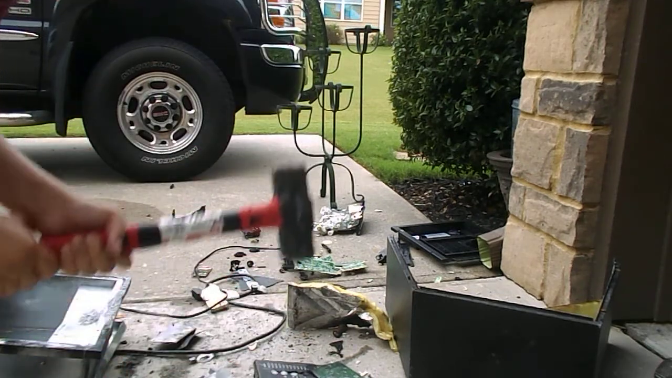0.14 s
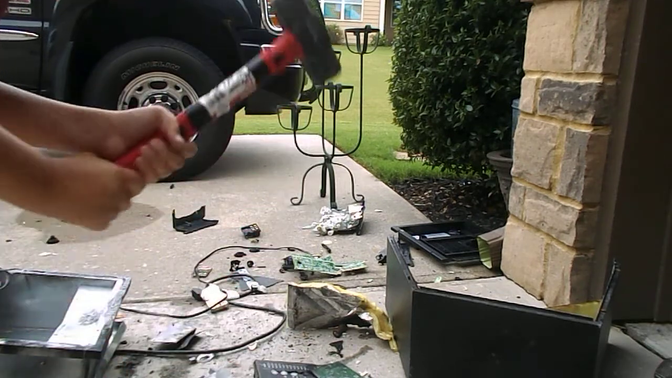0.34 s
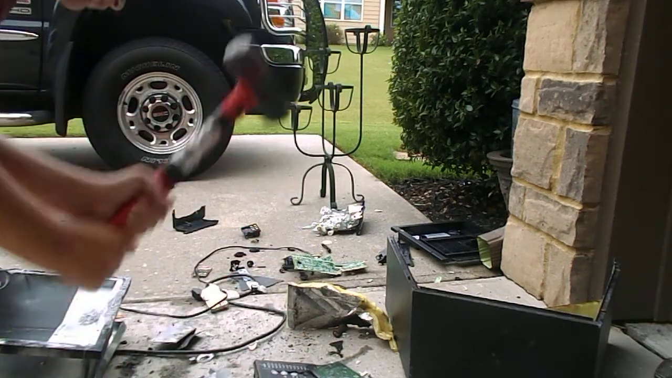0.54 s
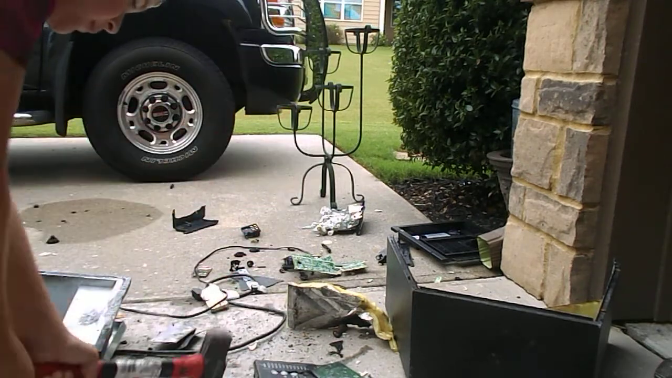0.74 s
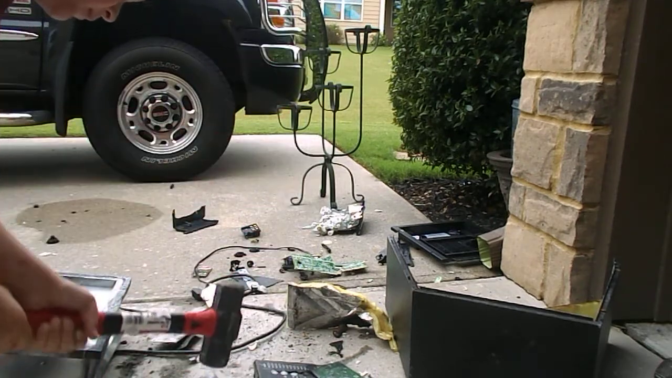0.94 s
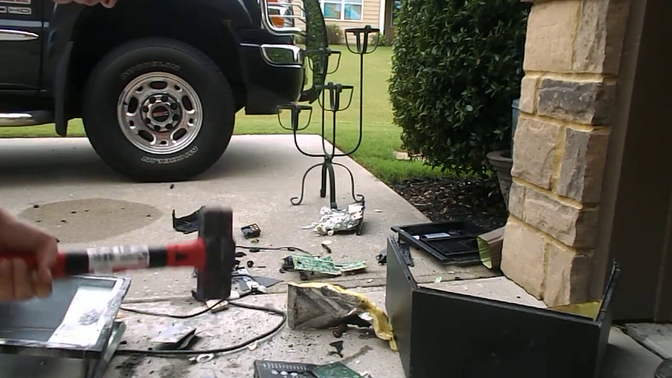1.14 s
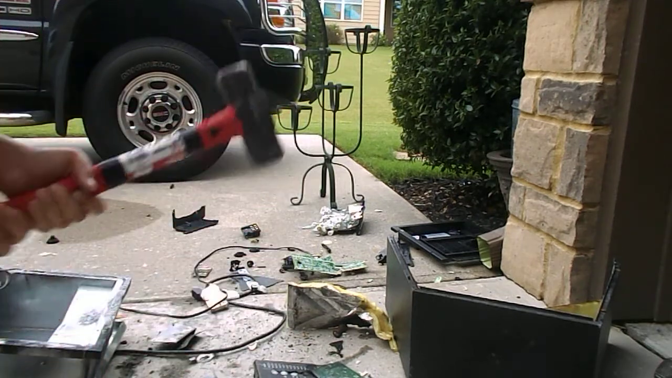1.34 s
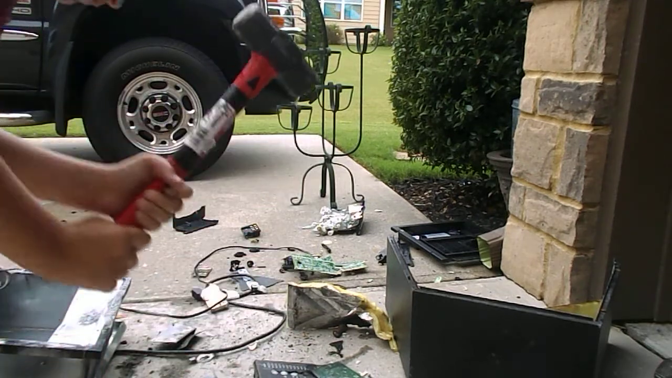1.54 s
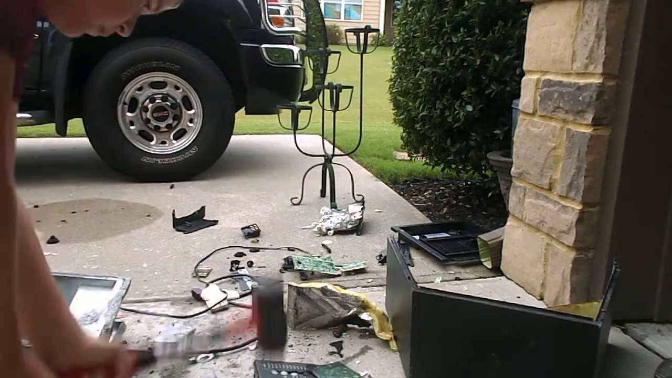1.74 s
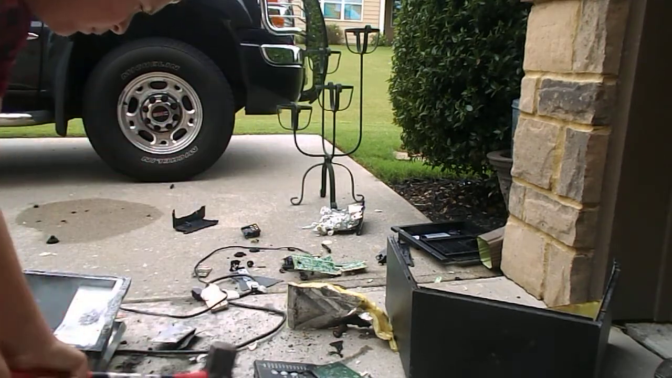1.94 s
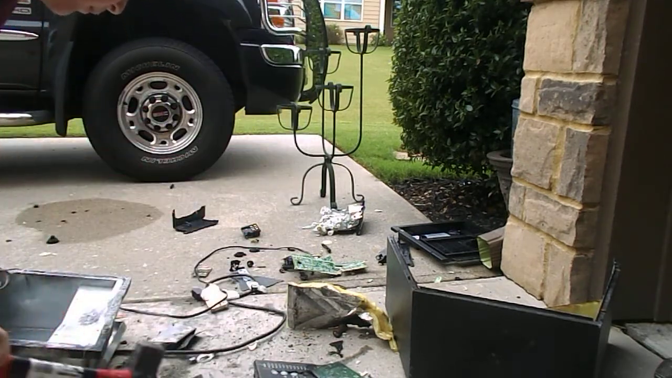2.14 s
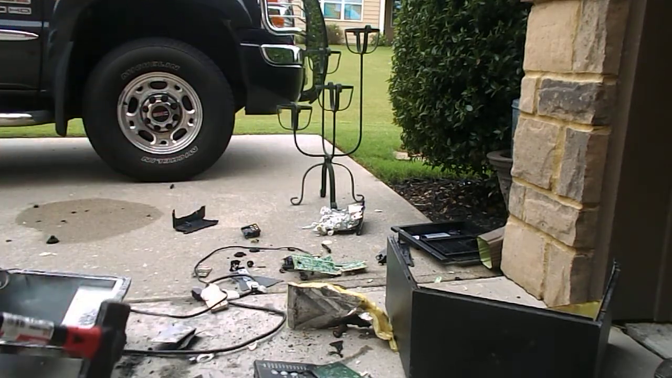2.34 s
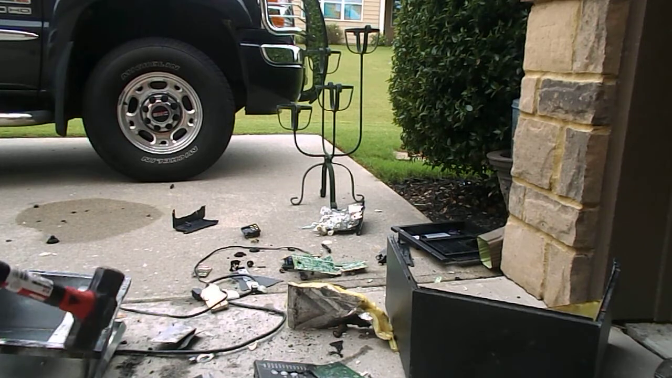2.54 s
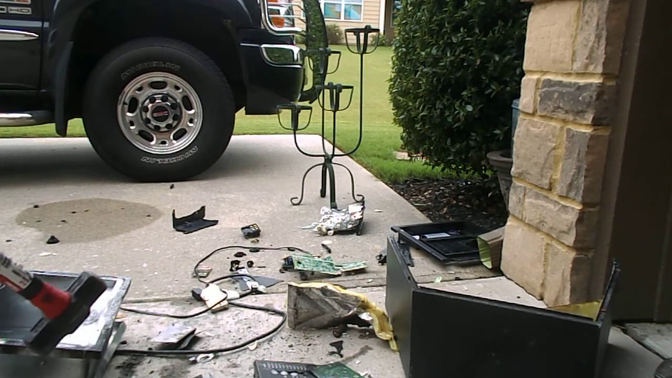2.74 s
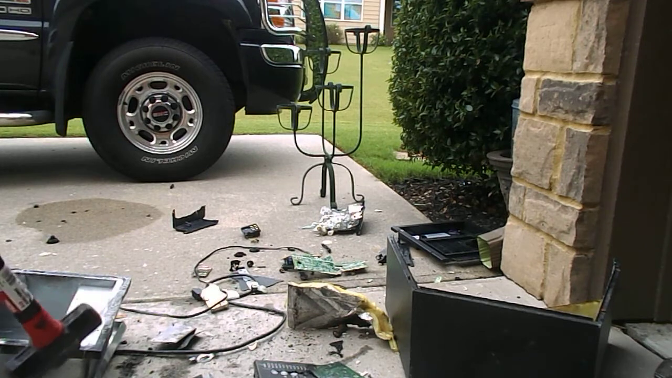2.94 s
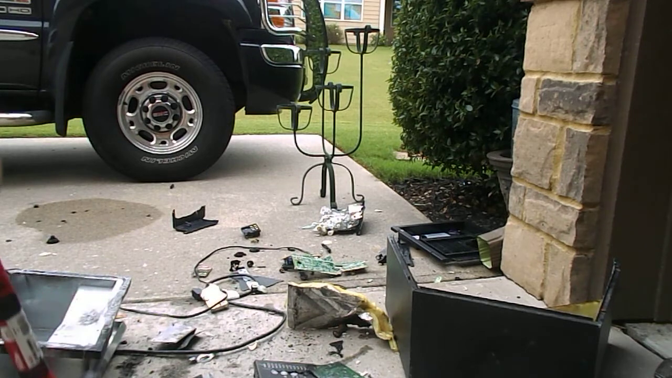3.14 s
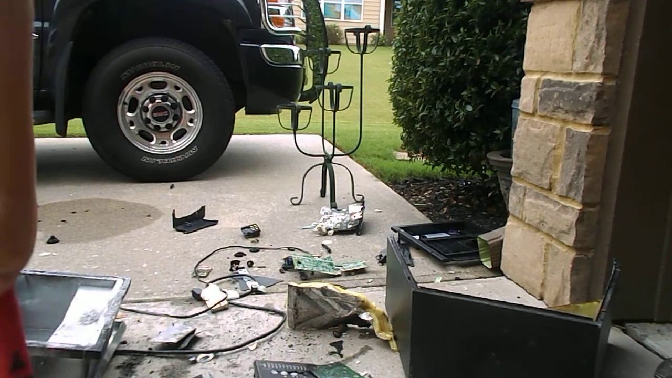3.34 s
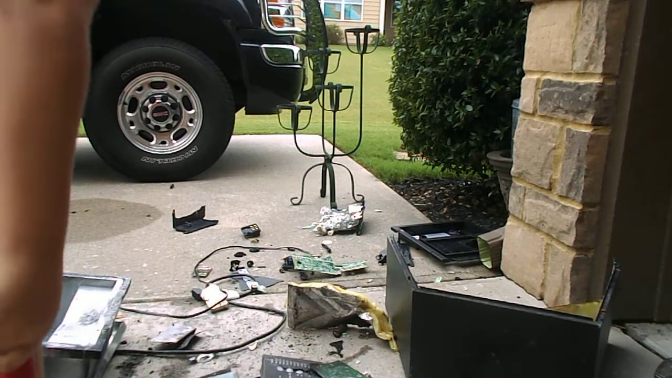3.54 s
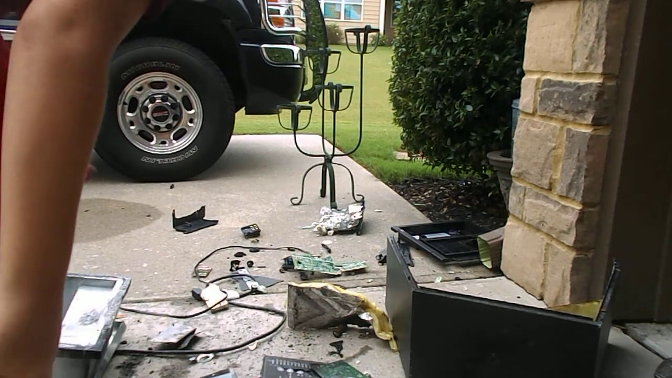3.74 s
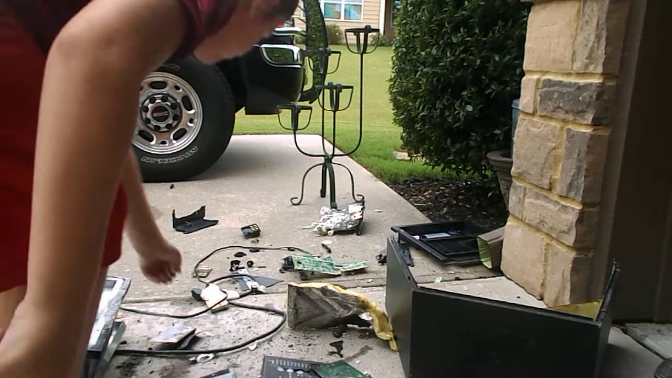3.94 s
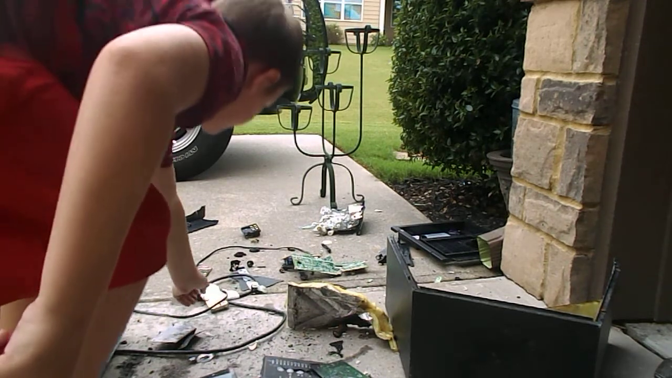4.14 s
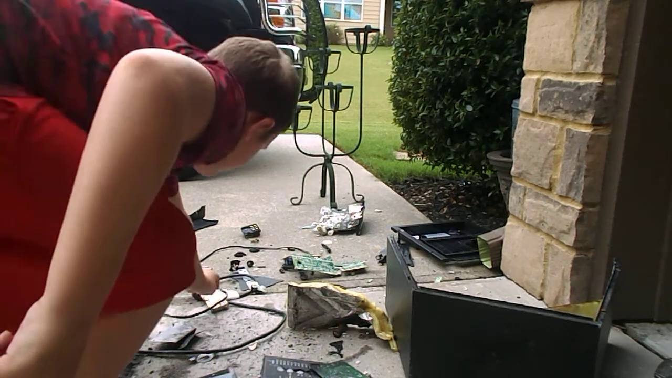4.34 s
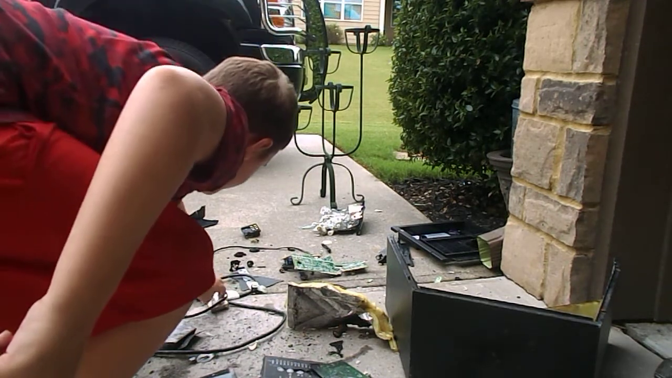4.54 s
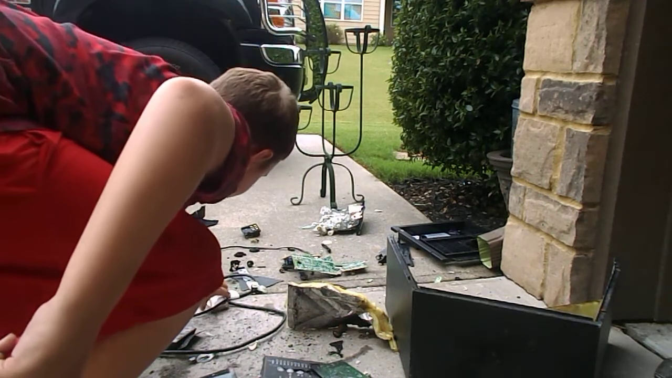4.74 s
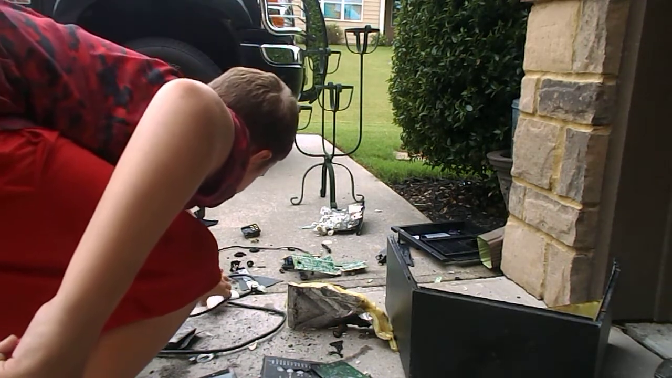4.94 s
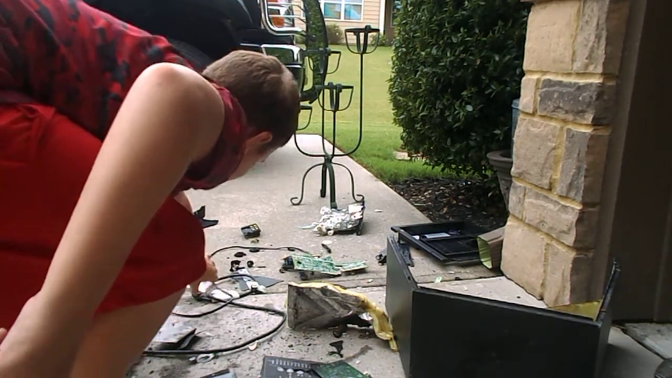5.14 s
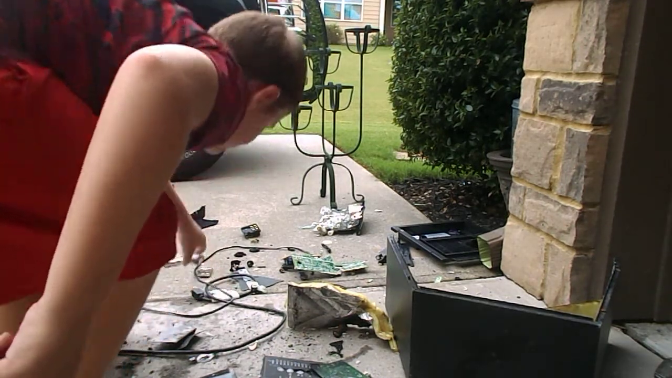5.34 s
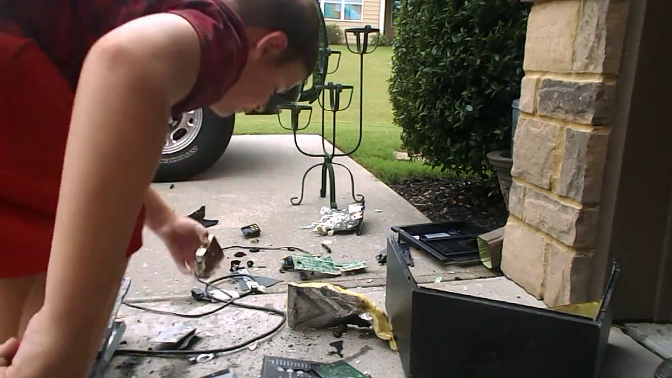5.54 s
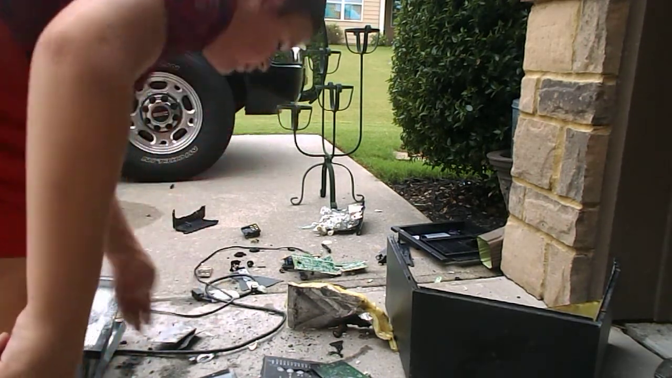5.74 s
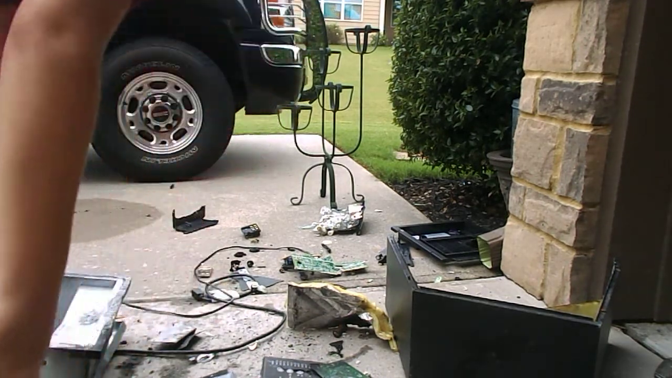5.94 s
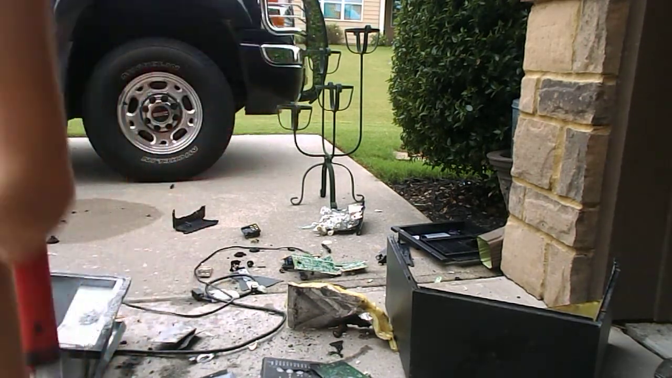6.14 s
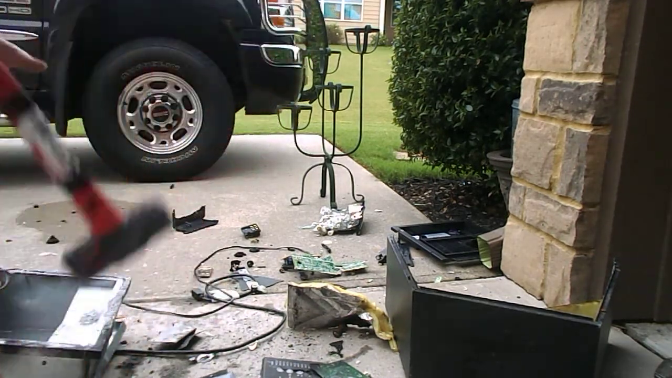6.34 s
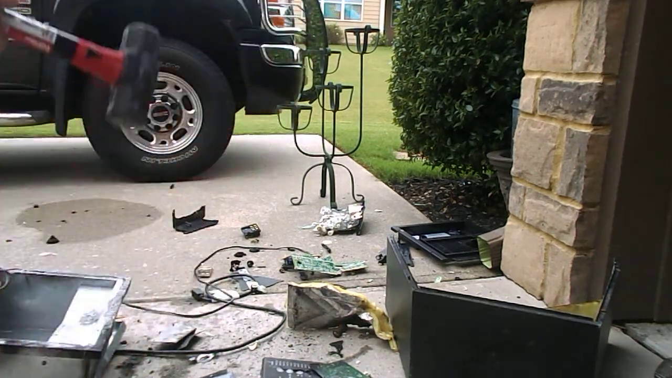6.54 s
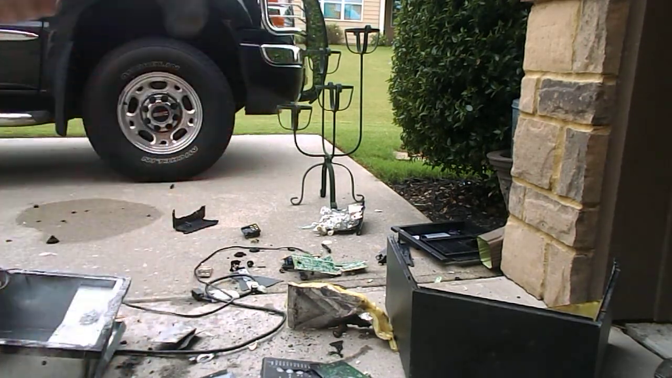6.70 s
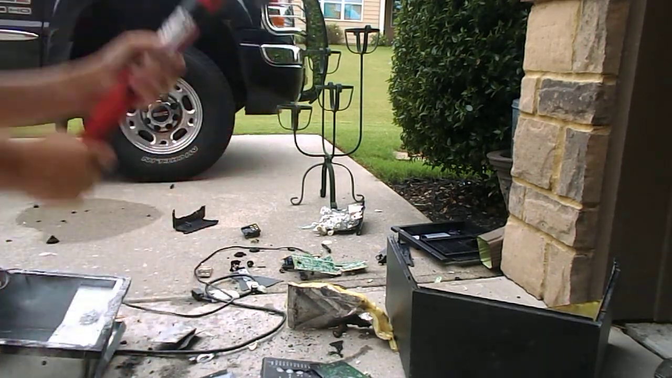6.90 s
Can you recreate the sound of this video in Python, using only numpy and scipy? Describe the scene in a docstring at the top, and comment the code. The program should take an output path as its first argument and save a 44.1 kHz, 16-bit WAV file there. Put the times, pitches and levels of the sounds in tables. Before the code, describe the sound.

Close, sharp crashes of a sledgehammer on sheet metal open the scene, each one ringing briefly as the housing clatters back onto concrete. After a pause come a softer strike, a dull box thud and light scraping and clicking of broken parts. Another rattling blow lands late, followed by scattered ticks. Soft outdoor air and a low machine hum lie behind, with a faint high insect buzz in the second half.

```python
"""A sledgehammer smashes thin metal housings on a concrete drive. Each impact cracks and excites the
bending modes of the sheet metal, which rings and rattles while an automatic gain control holds it flat.
Loose parts bounce, tick and scrape, and a hollow box thuds once.
Behind it a machine hums in the outdoor air, and an insect starts to buzz."""
import sys
import numpy as np
from scipy import signal
from scipy.fft import rfft, irfft
from scipy.io import wavfile
from scipy.ndimage import uniform_filter1d

SR = 44100
rng = np.random.default_rng(int(sys.argv[2]) if len(sys.argv) > 2 else 0)


def materialize(psi):
    """Save the field psi as 16-bit PCM at rate SR to the path in sys.argv[1].

    A 1-D psi becomes a single channel; in a 2-D psi each row is a channel.
    """
    bounded = np.clip(np.atleast_2d(psi).T, -1, 1)
    quanta = np.round(bounded * 32767).astype(np.int16)
    wavfile.write(sys.argv[1], SR, quanta)


N = 307377
TIME = np.arange(N) / SR
AGE = TIME[:SR]   # one second of ringing

# The housing's dense, weak modes. Each row: frequency in Hz, relative spectral density in dB.
SHEET_SPECTRUM = [(60, -42), (150, -27), (300, -22), (520, -17.5), (750, 2.5), (1200, 4), (2300, 2.5),
                  (3000, 2), (4300, 0), (5500, -5.5), (6500, -15), (8000, -20.5), (9500, -18.5),
                  (11000, -17)]


def from_db(db):
    """Decibels as an amplitude ratio."""
    return 10 ** (np.asarray(db) / 20)


def rms_one(x):
    """Normalisation to unit rms."""
    return x / np.sqrt(np.mean(x ** 2) + 1e-20)


def at_hz(points, hz):
    """Interpolation on a logarithmic frequency axis."""
    freqs, values = np.transpose(points)
    return np.interp(np.log(np.maximum(hz, 1)), np.log(freqs), values)


def tilted(hz, tilt, low_hz=600, high_hz=5000, pivot_hz=2000):
    """Spectral tilt: the gain of a midrange slope in dB per octave."""
    return from_db(tilt * np.log2(np.clip(hz, low_hz, high_hz) / pivot_hz))


def wander(per_s, size):
    """Random modulation: straight lines between Gaussian values."""
    knots = rng.standard_normal(int(per_s * size / SR) + 2)
    return np.interp(np.arange(size) * per_s / SR, np.arange(len(knots)), knots)


def noise(spectrum, size, tilt=0, humps_db=0, hump_spacing_hz=170):
    """Random-phase noise of unit rms; chance resonances set one piece of metal apart from another."""
    hz = np.fft.rfftfreq(size, 1 / SR)
    phases = np.exp(2j * np.pi * rng.random(len(hz)))
    centres = np.arange(0, SR / 2, hump_spacing_hz)
    humps = humps_db * np.interp(hz, centres, rng.standard_normal(len(centres)))
    return rms_one(irfft(phases * from_db(at_hz(spectrum, hz) + humps) * tilted(hz, tilt), size))


def decay(t60):
    """Exponential damping: 60 dB down after t60 seconds."""
    return from_db(-60 * AGE / t60)


def mode(hz, t60):
    """A normal mode: a damped sinusoid of random phase."""
    return np.sin(2 * np.pi * (hz * AGE + rng.random())) * decay(t60)


def add(track, s, sound):
    """Superposition: a sound joins the track at s seconds."""
    start = round(s * SR)
    part = sound[max(-start, 0):N - start]
    track[max(start, 0):max(start, 0) + len(part)] += part


def air(start_db=-55, rise_db_per_s=0.54):
    """Broadband ambient noise outdoors, slowly growing louder."""
    # Each row: frequency in Hz, relative spectral density in dB.
    spectrum = [(25, -15), (60, -5), (110, -2.5), (200, 2), (300, -7.5), (500, -8), (1000, -11.5),
                (2000, -13), (4000, -13.5), (5500, -20.5), (7000, -33), (11000, -33.5)]
    return from_db(start_db + rise_db_per_s * TIME) * noise(spectrum, N)


def machine_hum(pitch_hz=98.5, waver=0.00685, wavers_per_s=4, fundamental_db=3.0):
    """Periodic vibration gives a harmonic series: a wavering fundamental with weak overtones."""
    # The overtones. Each row: harmonic number, level in dB.
    harmonics = [(2, -60.5), (3, -66.5), (4, -67)]
    # The fundamental's envelope. Each row: time in seconds, relative level in dB.
    levels = [(0.0, -67.5), (2.14, -66.5), (2.41, -53), (2.83, -81), (3.22, -59.5), (3.71, -81),
              (3.9, -55.5), (4.8, -52), (5.75, -54), (5.86, -51), (6.33, -52.5), (6.97, -57.5)]
    phase = 2 * np.pi * np.cumsum(pitch_hz * (1 + waver * wander(wavers_per_s, N))) / SR
    envelope = from_db(fundamental_db + np.interp(TIME, *np.transpose(levels)))
    overtones = sum(from_db(db) * np.sin(round(k) * phase) for k, db in harmonics)
    return np.sqrt(2) * (envelope * np.sin(phase) + overtones)


def insect(start_s=4.57, swell_s=.55, level_db=-52, throb_hz=23, depth=.28):
    """Amplitude modulation of a high, narrow noise band: a buzz that swells and holds."""
    # Each row: frequency in Hz, relative spectral density in dB.
    spectrum = [(3500, -28), (4950, -5), (5330, 7), (5750, -2), (6600, -11.5), (8000, -39), (10500, -27)]
    swell = np.clip((TIME - start_s) / swell_s, 0, 1)
    throb = 1 + depth * np.sin(2 * np.pi * throb_hz * TIME)
    return from_db(level_db) * swell * throb * noise(spectrum, N)


def wall_reflections(x, wet_db=-9, t60=0.55, gap_s=.005):
    """Reverberation: diffuse reflections from nearby walls follow the direct sound."""
    tail = rng.standard_normal(SR) * decay(t60) * (AGE > gap_s)
    return x + from_db(wet_db) * signal.fftconvolve(x, tail / np.linalg.norm(tail))[:N]


def box_thud(start_s=3.728, noise_db=-17, t60=0.082, modes_db=-12, rise_s=0.0013):
    """A soft, heavy impact excites the low modes of a hollow box."""
    # Each row: frequency in Hz, relative level in dB, t60 in seconds.
    modes = [(136, -16, 0.069), (222, -9, 0.09), (285, 3.5, 0.035), (345, -26, 0.068), (437, -2.5, 0.043),
             (600, 3.5, 0.023)]
    # The dull contact. Each row: frequency in Hz, relative spectral density in dB.
    spectrum = [(40, -39), (110, -19), (200, -7), (280, -1), (400, 3), (580, -4), (900, -4), (3000, -42)]
    out = np.zeros(N)
    boom = sum((-1) ** k * from_db(db) * np.sin(2 * np.pi * hz * AGE) * decay(mode_t60)
               for k, (hz, db, mode_t60) in enumerate(modes))
    contact = from_db(noise_db) * noise(spectrum, SR) * decay(t60)
    onset = 1 - np.exp(-AGE / rise_s)
    add(out, start_s, (from_db(modes_db) * boom + contact) * onset)
    return out


def clanks():
    """Strongly damped modes: a dropped hollow piece rings briefly at each of two touches."""
    # Each row: start in seconds, level in dB.
    touches = [(4.129, -33), (4.146, -28.5)]
    # Each row: frequency in Hz, relative level in dB, t60 in seconds.
    modes = [(880, -7, 0.042), (1052, 0.5, 0.053), (1173, -6, 0.068), (4350, -2, 0.079)]
    out = np.zeros(N)
    for s, db in touches:
        add(out, s, from_db(db) * sum(from_db(level) * mode(hz, t60) for hz, level, t60 in modes))
    return out


def shards(tick_db=-5, tick_t60=0.017, scrape_db=-15, grain_db=6.0, grains_per_s=500):
    """Friction and impact: light pieces scrape unevenly as they tip, and tick at mid-stroke."""
    # Each row: tick time in seconds, relative level in dB, scrape half-width in seconds,
    # tilt in dB per octave.
    pieces = [(3.288, -29.5, 0.026, -3.5), (3.358, -23.5, 0.018, 1.5), (4.042, -28, .001, 2),
              (4.0962, -31, .001, 7), (4.13, -20.5, 0.0057, -1), (4.1466, -12, .002, 0),
              (4.47, -33.5, 0.016, 2.5), (4.6765, -20.5, 0.0012, 3.5), (4.7906, -32, .005, -4.5),
              (4.931, -29.5, 0.0053, 0), (5.3957, -37, .001, -3), (5.694, -29, 0.0034, -3),
              (5.833, -30.5, 0.028, -11.5), (6.3315, -9, 0.00088, 10), (6.4421, -20.5, 0.0031, 6.5),
              (6.539, -16, 0.01, -5), (6.5737, -15, 0.0011, 7), (6.588, -9.5, 0.0084, -1),
              (6.867, -24, 0.0077, -1), (6.9483, -26.5, 0.0011, 6.5)]
    # Each row: frequency in Hz, relative spectral density in dB.
    spectrum = [(100, -45), (650, -22), (1000, -5), (1400, -6.5), (2200, 6.5), (3300, 2), (4500, 6),
                (6500, -10.5), (8000, -18.5), (11000, -14.5)]
    out = np.zeros(N)
    for s, db, half_width, tilt in pieces:
        add(out, s, from_db(db + tick_db) * noise(spectrum, SR, tilt, humps_db=-2) * decay(tick_t60))
        grain = rms_one(from_db(grain_db * wander(grains_per_s, SR)))
        stroke = np.exp(-.5 * ((AGE - .5) / half_width) ** 2)
        scrape = noise(spectrum, SR, tilt, humps_db=7) * grain * stroke
        add(out, s - .5, from_db(db + scrape_db) * scrape)
    return out


def skipping_part(start_s=1.2761, first_hop_s=.103, restitution=.825, level_db=-32, loss_db=2.22):
    """Inelastic bouncing: a small steel part clinks on concrete, each hop shorter and weaker."""
    # Its strongest modes. Each row: frequency in Hz, relative level in dB, t60 in seconds.
    modes = [(3650, 2.5, 0.18), (4110, 7.5, 0.13), (4600, 8.5, 0.044), (4830, -11, 0.1)]
    # Its crowded modes. Each row: frequency in Hz, relative spectral density in dB.
    spectrum = [(200, -13), (480, -6.5), (620, 6.5), (850, 0), (1100, 0), (2000, 0.5), (3100, -2),
                (3900, 0.5), (4600, -2.5), (5500, -7.5), (7500, -21.5), (11000, -27)]
    out, s = np.zeros(N), start_s
    envelope = decay(t60=0.38) + from_db(-5) * decay(t60=0.0074)   # ring and snap
    for k in range(6):
        # every touch excites the modes in new proportions
        tones = sum(from_db(db + 3 * rng.standard_normal()) * mode(hz, t60) for hz, db, t60 in modes)
        clink = noise(spectrum, SR, humps_db=3.0) * envelope + from_db(-7) * tones
        add(out, s, from_db(level_db - loss_db * k) * clink)
        s += first_hop_s * restitution ** k
    return out


def loose_plate(level_db=-23.5):
    """Free vibration: a loose plate rings out after the first blow."""
    # Each row: frequency in Hz, relative level in dB, t60 in seconds.
    modes = [(700, -10, 0.95), (821, -3, 1.2), (1167, -13, 1.25), (1301, 0, 0.96), (1525, -1, 0.13),
             (2526, -1, 0.58)]
    out = np.zeros(N)
    add(out, 0, from_db(level_db) * sum(from_db(db) * mode(hz, t60) for hz, db, t60 in modes))
    return out


def sheet_ring(tilt, sustain, modes_db=-8.0, detune=0.00402):
    """The housing's impulse response: strong modes over a dense wash, the treble damped fastest."""
    # The strong modes. Each row: frequency in Hz, relative level in dB.
    modes = [(712, -12), (818, 2.5), (886, -2), (1102, 2), (1290, 1), (1534, 3.5), (1624, -4.5),
             (1706, -3.5), (1819, -32.5), (1907, -64), (2040, 5.5), (2293, 2), (2535, 2), (2690, -1),
             (3480, -2.5), (3856, 7)]
    # Each row: frequency in Hz, t60 in seconds at a sustain of 1.
    ring_times = [(200, 1), (800, 0.61), (2000, 0.43), (5000, 0.41), (11000, 0.37)]
    wash = rfft(noise(SHEET_SPECTRUM, SR, tilt, humps_db=2.5))
    hz = np.fft.rfftfreq(SR, 1 / SR)
    octave = np.round(np.log2(np.maximum(hz, 100)))
    dense = sum(irfft(wash * (octave == k), SR) * decay(sustain * at_hz(ring_times, 2 ** k))
                for k in np.unique(octave))
    pitches, levels = np.transpose(modes)
    pitches = pitches * (1 + detune * rng.standard_normal(len(pitches)))   # every dent retunes them
    gains = from_db(levels) / np.linalg.norm(from_db(levels)) * np.sqrt(2) * tilted(pitches, tilt)
    strong = sum(gain * mode(f, sustain * at_hz(ring_times, f)) for f, gain in zip(pitches, gains))
    return dense + from_db(modes_db) * strong


def rattle(length_s, per_s=600, spread_db=3.0, clump_db=4.5, clumps_per_s=35, fall_db_per_s=40):
    """Intermittent contact: a buckled panel chatters in clumps of weakening impulses until it settles."""
    touches = (rng.random(SR) < per_s / SR) * rng.choice([-1, 1], SR)
    scatter_db = spread_db * np.minimum(rng.exponential(1, SR), 4)
    strengths = from_db(scatter_db + clump_db * wander(clumps_per_s, SR))
    settling = .5 - .5 * np.tanh((AGE - length_s) / 0.0051)
    return rms_one(touches * strengths) * from_db(-fall_db_per_s * AGE) * settling


def struck_panel(s, db, rattle_s, tilt, sustain, ring_db, snap_db, snap_t60=0.025):
    """Convolution: a struck panel rings, and each impulse of its rattle excites it again with a snap."""
    out = np.zeros(N)
    ring = sheet_ring(tilt, sustain)
    snap = noise(SHEET_SPECTRUM, SR, tilt) * decay(snap_t60)
    touch = ring / np.linalg.norm(ring) + from_db(snap_db) * snap / np.linalg.norm(snap)
    add(out, s, from_db(db + ring_db) * ring)
    add(out, s, from_db(db) * signal.fftconvolve(rattle(rattle_s), touch))
    return out


def crack(db, tilt, t60):
    """A brief, hard contact radiates a broadband transient."""
    # Each row: frequency in Hz, relative spectral density in dB.
    spectrum = [(50, -36), (150, -1), (400, -0.5), (1200, 15.5), (2500, 6.5), (4000, 11), (6000, -10),
                (8000, -8), (11000, -15)]
    return from_db(db) * noise(spectrum, SR, tilt) * decay(t60)


def edge_knocks(ring_db=-22):
    """Stiff contact of a steel edge on concrete: a bright crack with little ring."""
    # Each row: start in seconds, level in dB.
    knocks = [(.7995, 10), (0.9222, 1), (2.1061, -2.5), (3.5263, -33), (3.911, -16), (6.514, -21),
              (6.595, -14.5), (6.8361, -22.5)]
    out = np.zeros(N)
    for s, db in knocks:
        add(out, s, crack(db, tilt=10.4, t60=0.0072))
        add(out, s, from_db(db + ring_db) * sheet_ring(tilt=4.5, sustain=0.83))
    return out


def housing_landings(crack_db=-5):
    """Secondary impacts: the housing drops back with a softer crack; one panel rings and chatters."""
    # Each row: start in seconds, relative level in dB, rattle length in seconds, tilt in dB per octave.
    landings = [(0.851, -7, 0.099, .5), (.955, -13.5, 0.037, 4.5), (0.994, -12, 0.048, -2),
                (1.145, -28.5, 0.0088, 1), (2.0715, -5, 0.077, 0.5), (2.24, -10.5, .075, -2),
                (2.368, -24.5, 0.091, -2), (3.637, -18, 0.1, -0.5), (3.774, -24, 0.051, -1.5),
                (3.869, -27.5, 0.0476, 1.5), (6.004, -11, 0.062, -1), (6.276, -23, 0.012, 1.5),
                (6.517, -34, 0.0038, 1.5), (6.594, -44, 0.024, 11), (6.836, -38, 0.0072, 10.5)]
    out = np.zeros(N)
    for s, db, rattle_s, tilt in landings:
        add(out, s, crack(db + crack_db, tilt, t60=0.0074))
        out += struck_panel(s, db, rattle_s, tilt, sustain=0.83, ring_db=-2, snap_db=-2)
    return out


def hammer_blows(panel_count=3):
    """Impulsive excitation: the hammer cracks on the housing and drives several panels at once."""
    # Each row: start in seconds, crack level in dB, panel level in dB, rattle length in seconds,
    # tilt in dB per octave.
    blows = [(-.15, 3, -12, 0.25, 0.5), (.791, -2.5, -4, 0.016, -1.4), (1.8759, 7.5, -3.5, 0.37, 1),
             (3.5312, -17.5, -19, 0.244, 4), (5.8766, -21, -9.5, 0.32, 0.45)]
    out = np.zeros(N)
    for s, crack_db, panel_db, rattle_s, tilt in blows:
        add(out, s, crack(crack_db, tilt, t60=0.045))
        panels = sum(struck_panel(s, panel_db, rattle_s, tilt, sustain=1.0, ring_db=-3.5, snap_db=-1)
                     for _ in range(panel_count))
        out += panels / np.sqrt(panel_count)   # incoherent sources add in power
    return out


def scene(panel_cut_hz=270):
    """Superposition of struck metal, reverberant debris and the outdoor background."""
    metal = hammer_blows() + housing_landings() + edge_knocks() + loose_plate() + skipping_part()
    # thin panels radiate little bass
    metal = signal.sosfilt(signal.butter(2, panel_cut_hz, "high", fs=SR, output="sos"), metal)
    debris = wall_reflections(shards() + clanks() + box_thud())
    return (metal + debris + machine_hum() + air() + insect())[None]


def gain_control(x, threshold_db=-15.0, release_db_per_s=100, attack_s=0.0026):
    """Limiting: the gain drops quickly when the power passes a threshold, then climbs back steadily."""
    power = uniform_filter1d(x ** 2, size=88, origin=43)   # mean over the past 2 ms
    excess_db = np.maximum(10 * np.log10(np.maximum(power, 1e-12)) - threshold_db, 0)
    release_db = release_db_per_s * TIME
    reduction_db = np.maximum.accumulate(excess_db + release_db, axis=-1) - release_db
    pole = np.exp(-1 / (attack_s * SR))
    return x * from_db(-signal.lfilter([1 - pole], [1, -pole], reduction_db))


def record(dry, ceiling=0.47, bass_cut_hz=72, top_cut_hz=11650):
    """Peaks that outrun the gain control clip; filters limit the bandwidth and notch the treble."""
    # Each row: centre frequency in Hz, width in Hz.
    treble_dips = [(7000, 1000), (8500, 900), (10000, 800), (12000, 1300)]
    x = np.clip(gain_control(dry), -ceiling, ceiling)
    x = signal.sosfilt(signal.butter(4, bass_cut_hz, "high", fs=SR, output="sos"), x)
    for hz, width in treble_dips:
        x = signal.lfilter(*signal.iirnotch(hz, hz / width, fs=SR), x)
    return signal.sosfilt(signal.ellip(12, .5, 70, top_cut_hz, fs=SR, output="sos"), x)


dry = scene()
out = record(dry)
materialize(out)
```